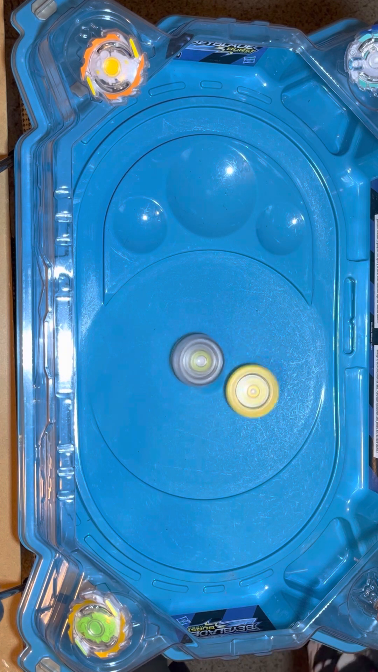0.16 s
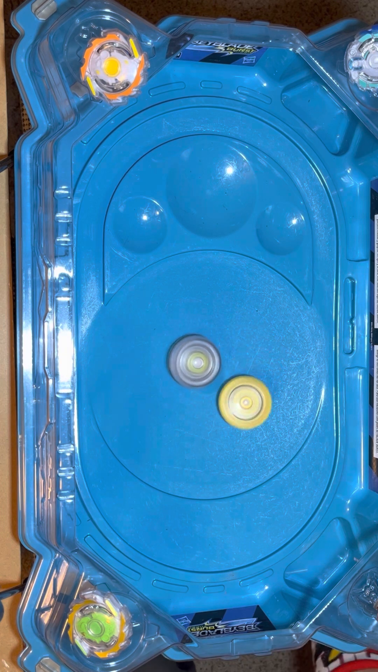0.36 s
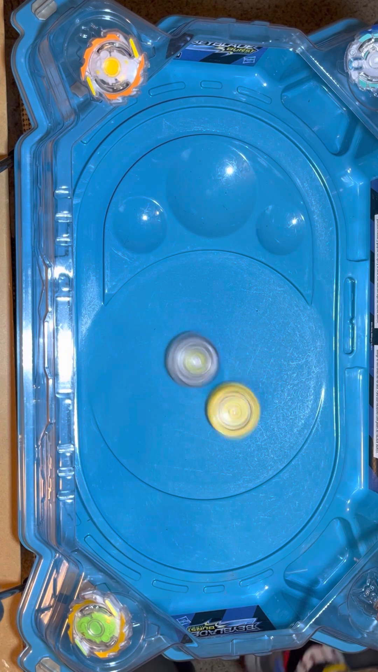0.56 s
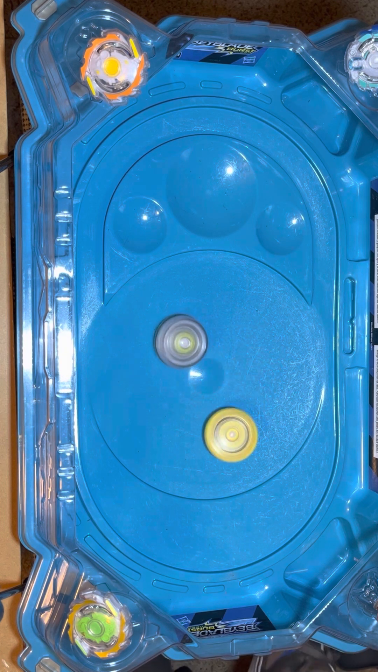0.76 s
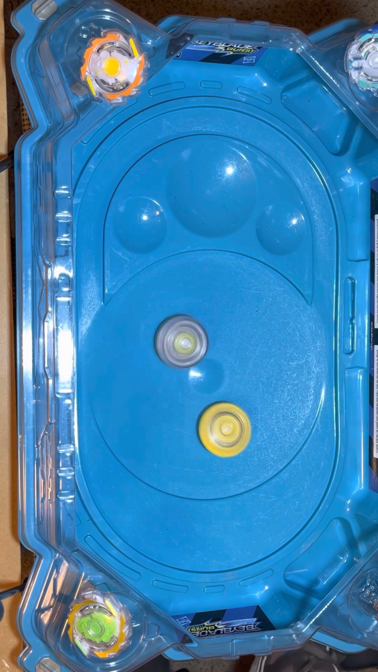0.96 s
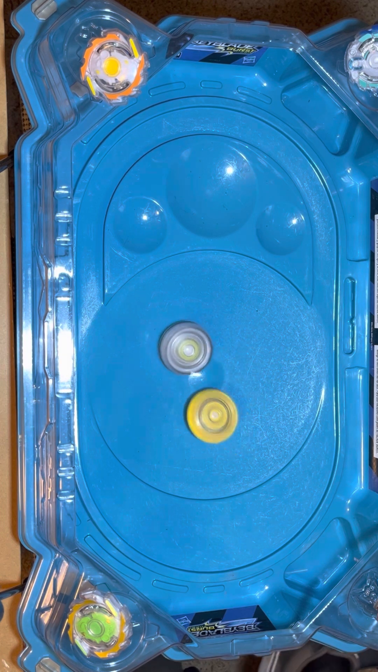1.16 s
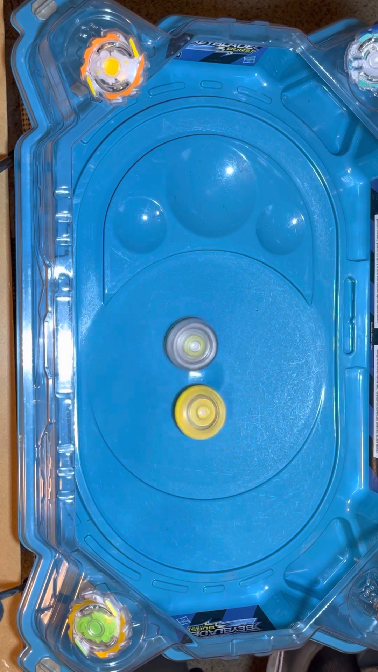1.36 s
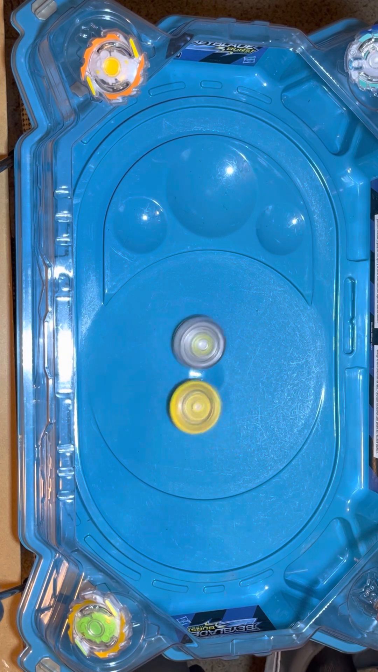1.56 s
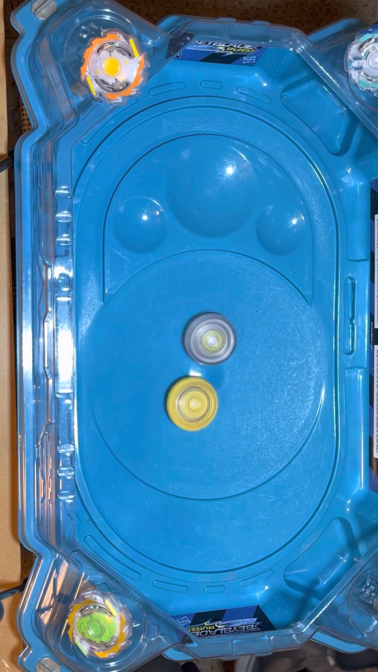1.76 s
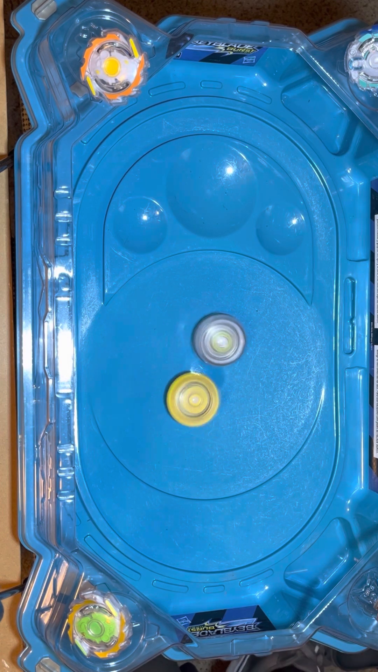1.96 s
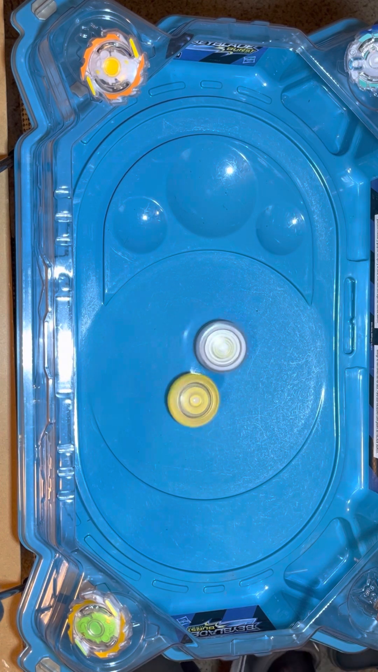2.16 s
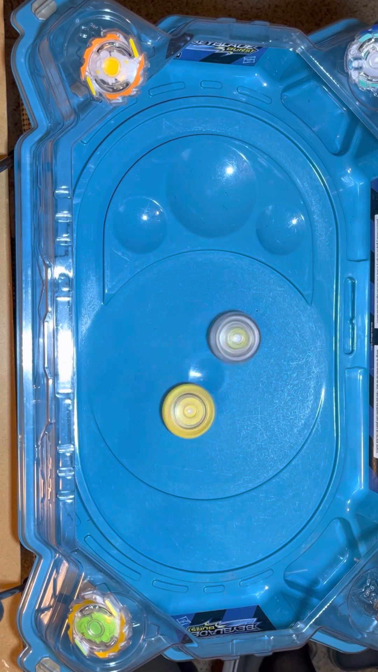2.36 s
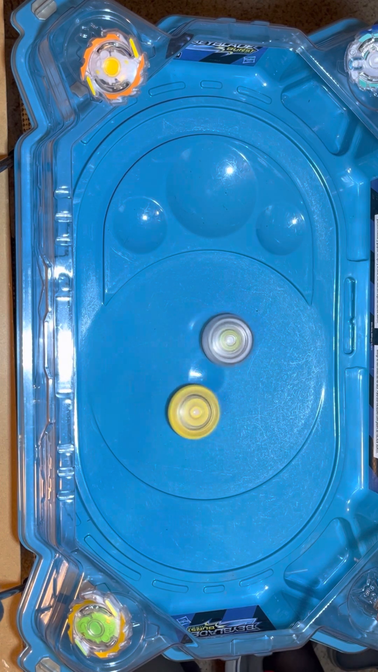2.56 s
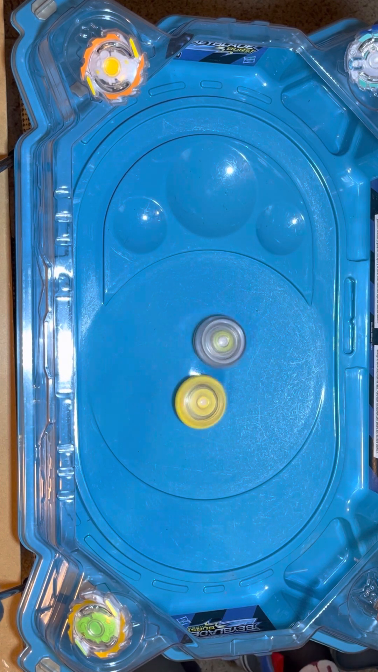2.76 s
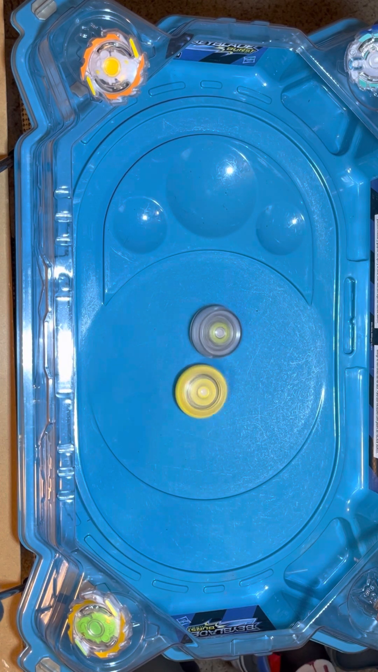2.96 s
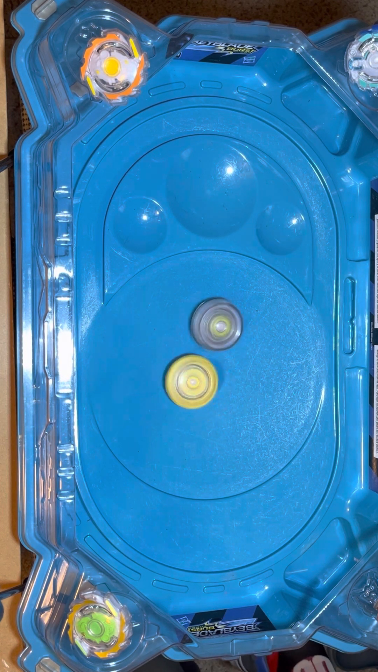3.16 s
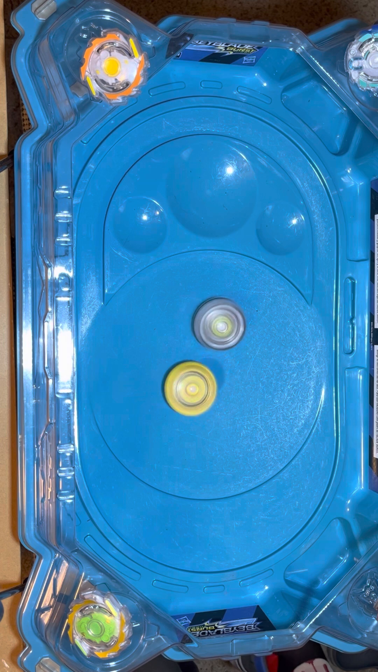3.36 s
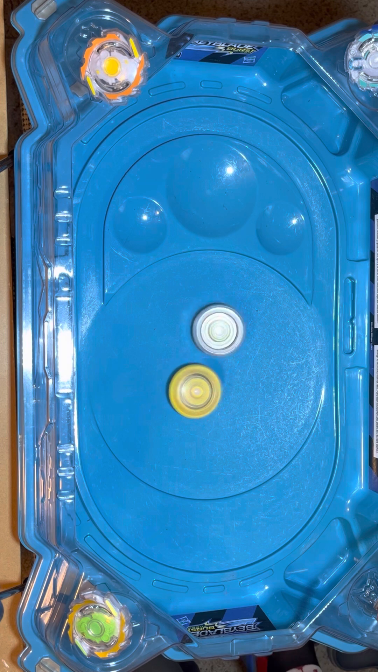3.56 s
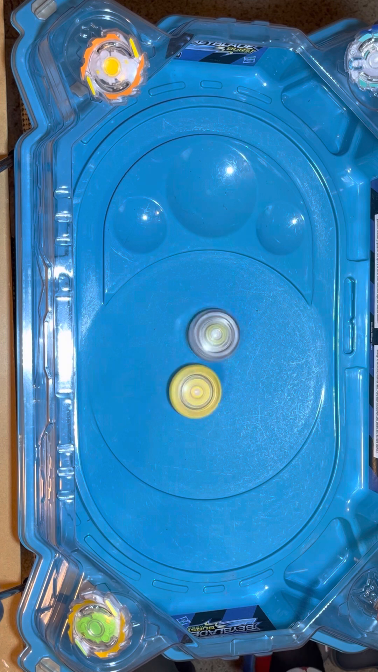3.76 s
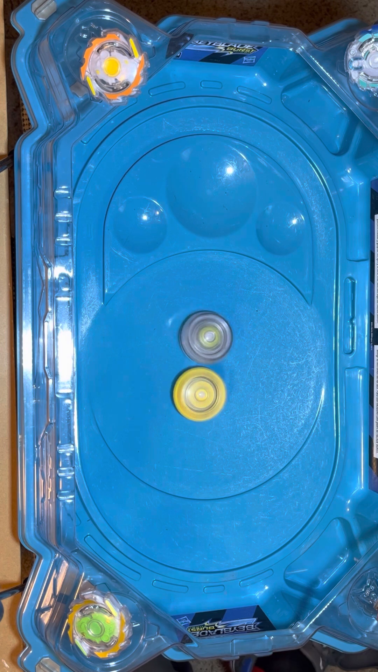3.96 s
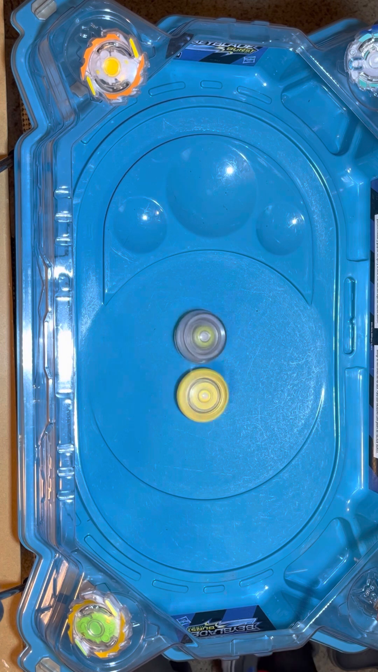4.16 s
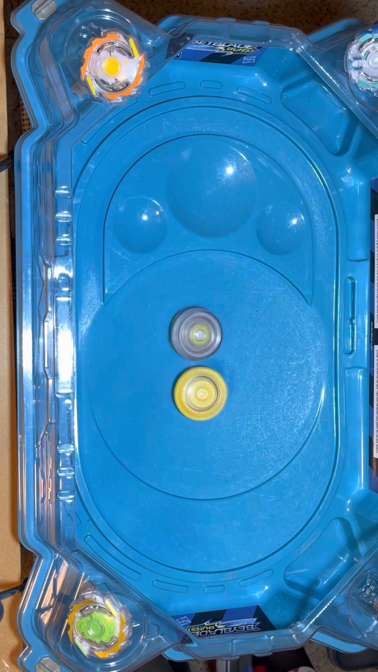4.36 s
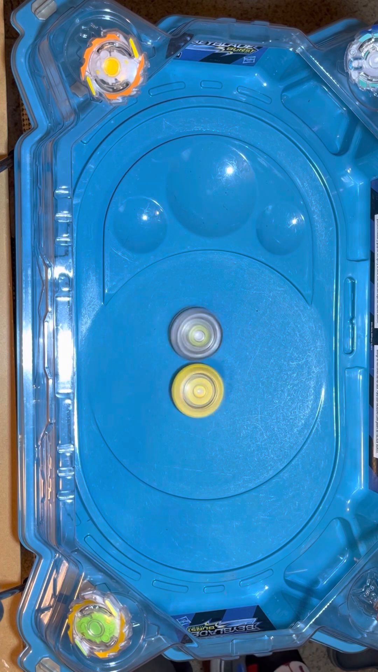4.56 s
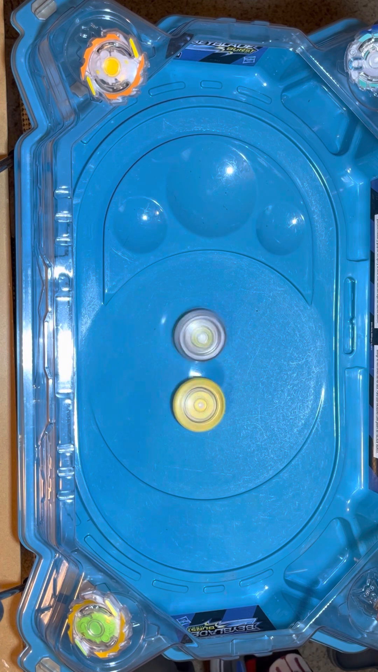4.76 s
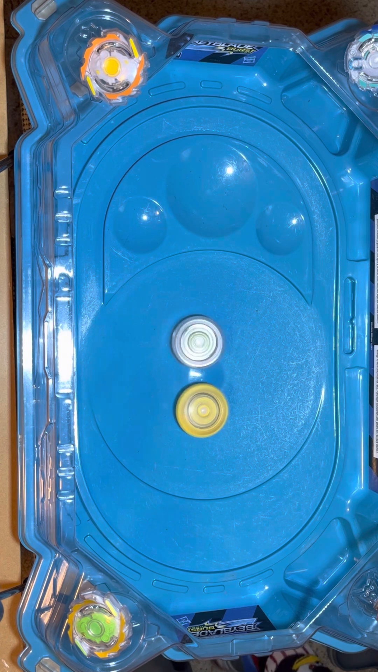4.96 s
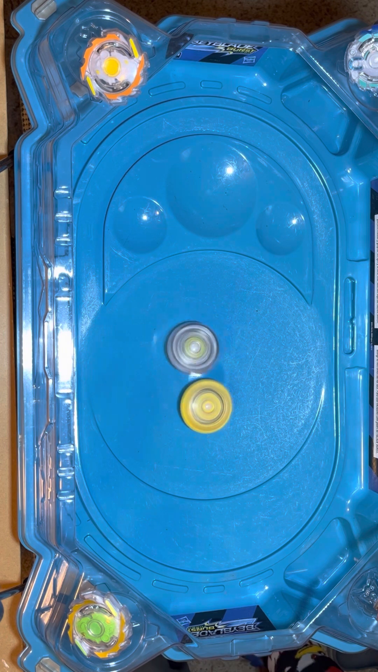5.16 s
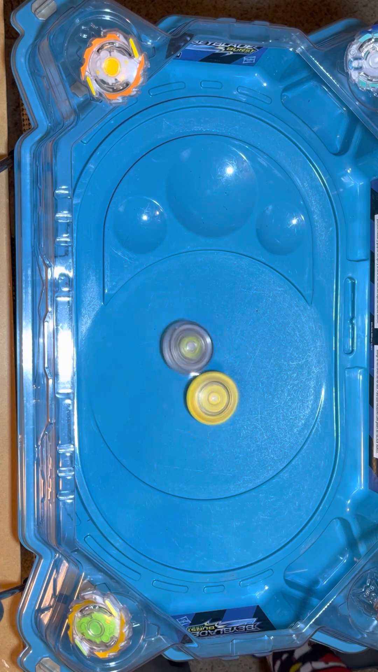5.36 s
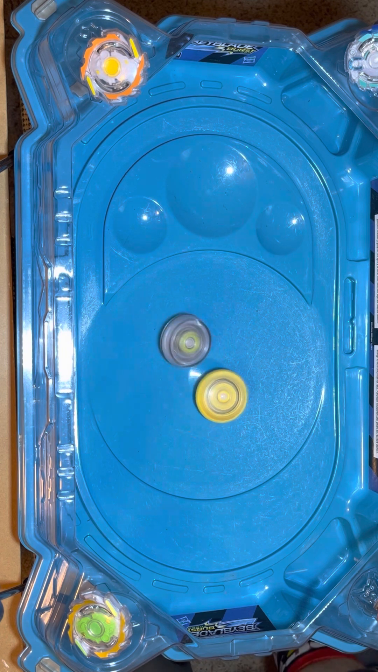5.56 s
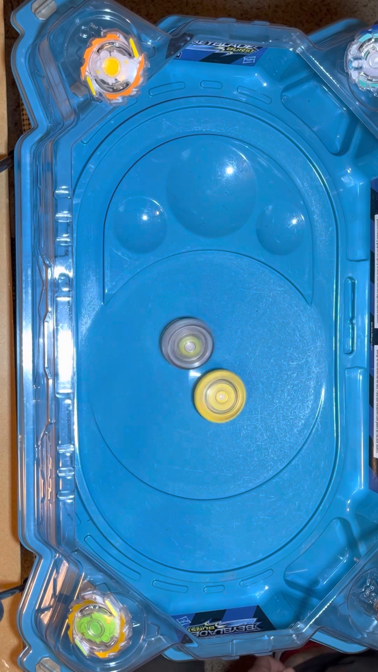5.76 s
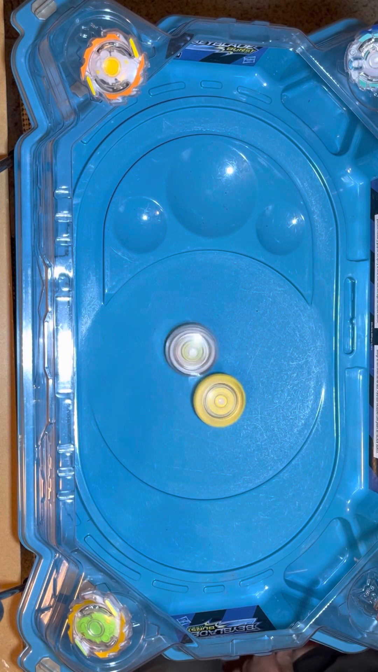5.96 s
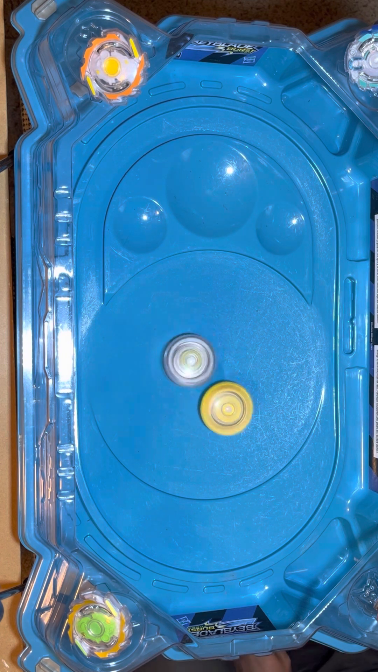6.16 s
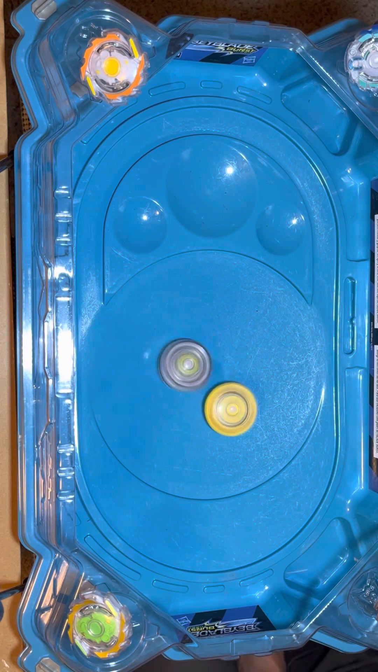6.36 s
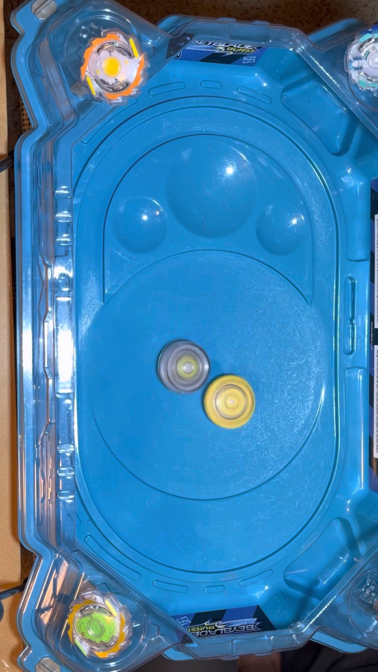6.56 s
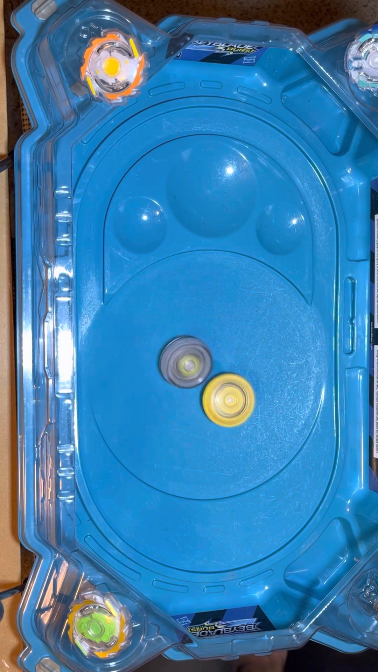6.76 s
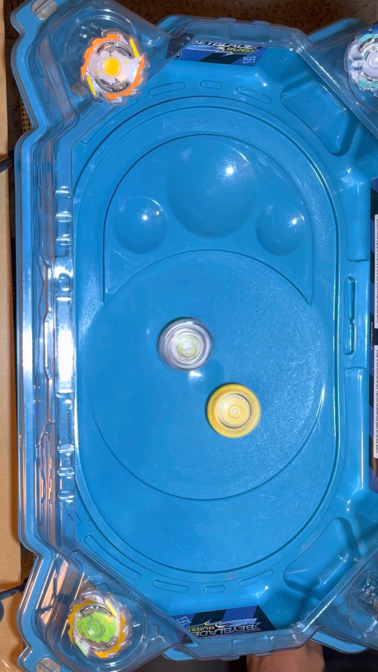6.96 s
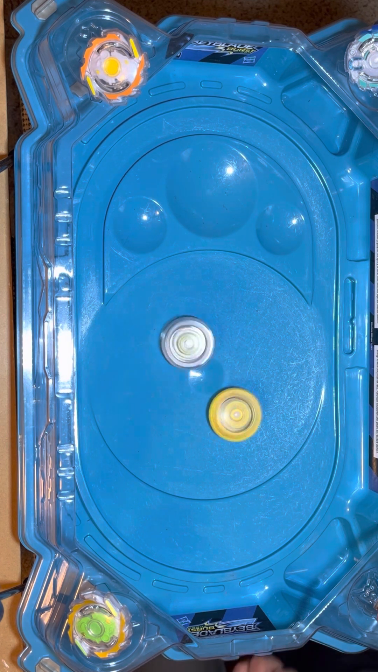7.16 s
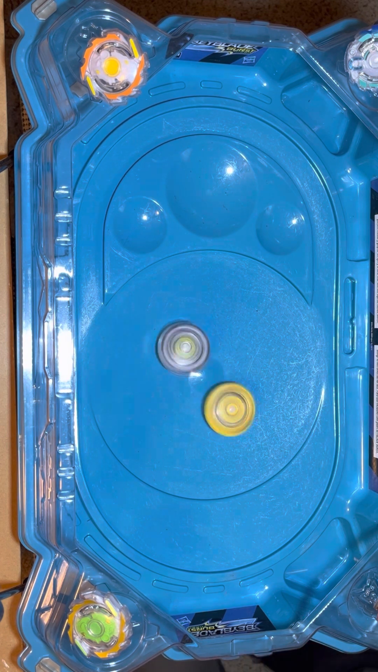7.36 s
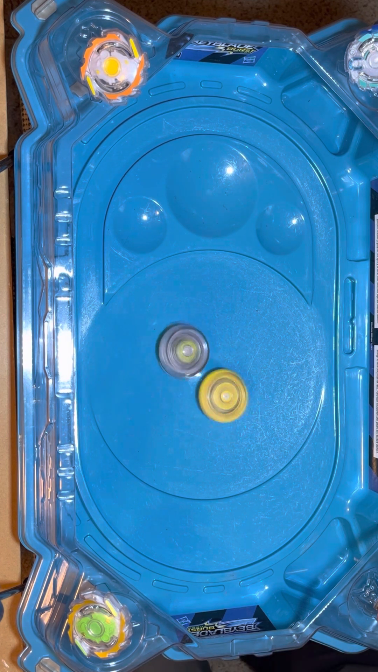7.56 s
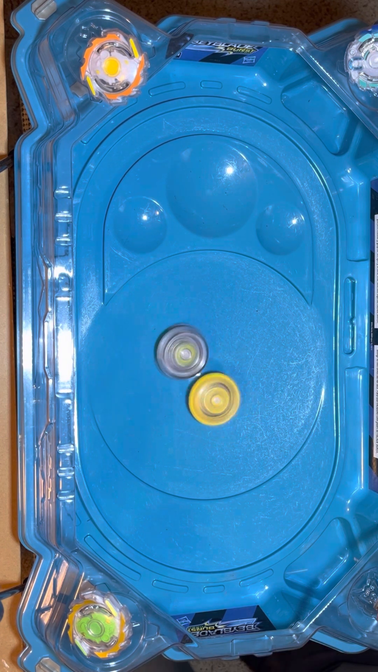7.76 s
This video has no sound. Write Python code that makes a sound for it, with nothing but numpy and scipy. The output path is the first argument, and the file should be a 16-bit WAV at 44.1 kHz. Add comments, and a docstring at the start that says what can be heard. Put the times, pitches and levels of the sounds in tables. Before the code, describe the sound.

Two toy tops spin in a thin plastic arena, heard from close above. Their tips make a faint, gritty whirr throughout, over a low, steady, slightly pulsing hum. The tops collide in sharp, bright clacks, each with a short metallic ring and a little skid. Clacks land at about 0.1 and 0.5 seconds, then a quick pair at 1.3, one at 1.5, another pair at 1.9 and a strong hit at 2.2. More follow at 2.8 and 3.1, lighter ones at 3.7 and 4.0, and a hard one at 4.6. The plastic rumbles softly after some hits, and a wobbling top briefly buzzes and ticks, mostly in the first second and around 5.5. Further clacks come at 5.2, 5.4, 5.9, 6.7 and 6.9 seconds. Small taps and dull knocks follow, then two last sharp clacks near 7.7 and 7.8.

```python
"""In a thin plastic arena, two spinning toy tops collide, heard by a phone held above them.
Each impact excites a broadband crack and the damped modes of tops and shell, then the tips skid.
Sliding friction makes the tips whirr and drives the shell's lowest modes into a rumble. A wobbling
top ticks once a turn and forces a harmonic drone. Beneath lie a beating hum and faint room noise."""
import sys
import numpy as np
from scipy import signal
from scipy.fft import rfft, irfft, next_fast_len
from scipy.io import wavfile
from scipy.ndimage import uniform_filter1d

SR = 44100
rng = np.random.default_rng(int(sys.argv[2]) if len(sys.argv) > 2 else 0)


def log_audio(samples):
    """Write samples as a 16-bit WAV file to the path given in sys.argv[1]."""
    # one column per channel
    frames = np.atleast_2d(samples).T
    # limit to full scale, then quantise
    limited = np.clip(frames, -1, 1)
    pcm = np.round(limited * 32767).astype(np.int16)
    wavfile.write(sys.argv[1], SR, pcm)


N = 347949
T = np.arange(N) / SR
M = next_fast_len(N)
F = np.arange(M // 2 + 1) * SR / M
OCTAVE = np.log2(F + 1)
BAND_CENTRES_HZ = 250 * 2 ** np.arange(0, 6.1, .5)


def undb(db):
    return np.exp(np.asarray(db) * np.log(10) / 20)

def unit(x):
    return x / np.sqrt(np.mean(x ** 2))

def noise_spectrum():
    return rfft(rng.standard_normal(M))

def over_time(table):
    """A table's columns, interpolated at every sample."""
    times, *columns = np.transpose(table)
    return [np.interp(T, times, c) for c in columns]

def at_frequency(table, hz):
    """A table's columns, interpolated in log frequency."""
    centres, *columns = np.transpose(table)
    return [np.interp(np.log(hz), np.log(centres), c) for c in columns]

def resonances(modes):
    """Superposed responses of second-order resonators (f/Hz, bandwidth/Hz, gain/dB)."""
    return sum(undb(db) / (1 + 1j * (F ** 2 - hz ** 2) / ((F + 1) * width)) for hz, width, db in modes)

def window(hz):
    """Cosine passband reaching half an octave to either side of hz."""
    octaves = OCTAVE - np.log2(hz)
    return np.where(np.abs(octaves) < .5, np.cos(np.pi * octaves), 0)

def band(spectrum, hz):
    """One band of a spectrum as a signal of unit RMS."""
    return unit(irfft(spectrum * window(hz), M)[:N])

def shelves(hz):
    """Weights, 0 to 1, with which a band takes bass and treble gains."""
    return np.clip(2 * np.log2(1400 / hz), 0, 1), np.clip(np.log2(hz / 2800), 0, 1)

def decays(times, sizes, t60):
    """Envelope that jumps at each time and decays exponentially."""
    impulses = np.zeros(N)
    np.add.at(impulses, np.minimum((times * SR).astype(int), N - 1), sizes)
    return signal.lfilter([1], [1, -np.exp(-np.log(1000) / (t60 * SR))], impulses)

def swells(times, sizes, lengths, rise_s):
    """Envelope with an exponential rise and a Gaussian fall after each time."""
    out = np.zeros(N)
    for start, size, length in zip(times, sizes, lengths):
        i = int(start * SR)
        t = T[:min(int(3 * length * SR), N - i)]
        out[i:i + len(t)] += size * (1 - np.exp(-t / rise_s)) * np.exp(-(t / length) ** 2)
    return out

def wander(rate_hz):
    """Smoothly joined random values with a spread near 1."""
    steps = uniform_filter1d(np.repeat(rng.standard_normal(int(N / SR * rate_hz) + 2), 4), 4)
    return 1.2 * np.interp(T * rate_hz * 4, np.arange(len(steps)), steps)

def strike(out, start, hz, db, t60):
    """Impulse response of modes: adds damped sinusoids to out."""
    i = int(start * SR)
    t = T[:min(int(np.max(t60) * SR * .7), N - i), None]
    envelope = (1 - np.exp(-t / .0008)) * undb(db - 60 * t / t60)
    out[i:i + len(t)] += (envelope * np.sin(2 * np.pi * hz * t)).sum(axis=1)


# Room noise spectrum: f/Hz, level/dB per half octave
ROOM_SPECTRUM = [(30, -62), (60, -85), (150, -70.5), (300, -73), (500, -79.5), (1000, -74.5), (3000, -86),
                 (16000, -89)]

def room_noise():
    """Incoherent bands add in power to a noise floor, which drifts slightly in level."""
    power = 0
    for hz in 31.25 * 2 ** np.arange(0, 9.1, .5):
        db, = at_frequency(ROOM_SPECTRUM, hz)
        passband = window(hz) ** 2
        power += undb(db) ** 2 * passband / np.mean(passband)
    return undb(0.5 * wander(11)) * irfft(noise_spectrum() * np.sqrt(power), M)[:N]


def room_hum(hz=119.92, neighbour_hz=122.55, beat_peak_s=.34):
    """Beating: a tone with a faint octave interferes with a close neighbour; narrowband noise wavers."""
    waver = unit(irfft(noise_spectrum() * resonances([(hz, 24, 0)]) ** 2, M)[:N])
    phase_per_hz = 2 * np.pi * (T - beat_peak_s)
    tone = np.sin(hz * phase_per_hz) + undb(-26) * np.sin(2 * hz * phase_per_hz)
    neighbour = undb(-10.5) * np.sin(neighbour_hz * phase_per_hz)
    return undb(-48.5) * unit(unit(tone + neighbour) + undb(-3) * waver)


# Tips rubbing on the shell: t/s, level/dB, treble gain/dB, shell body gain/dB
TIP_WHIRR = [(0, -57, -8, -21), (.33, -62.5, -12, -14.5), (.5, -60.5, -8, -17), (.8, -61, -13.5, -21),
             (1.2, -56, -11.5, -15.5), (1.4, -65.5, -10.5, 7), (1.72, -56.5, -6.5, -3),
             (2, -67, -11.5, -2.5), (2.3, -57, -13.5, -2.5), (2.66, -74.5, -9, -5.5),
             (2.9, -70.5, -14, 10.5), (3.05, -61.5, -14, 5), (3.25, -65, -8.5, 10), (3.67, -59, -13.5, 3.5),
             (4.11, -68, -17, 8), (4.3, -61.5, -10.5, 0), (4.57, -57, -6, -3), (4.75, -59, -15.5, 0),
             (5.05, -72.5, -15.5, 2.5), (5.27, -78, -12, 0), (5.41, -57, -15.5, 3), (6.03, -52, -15, -3),
             (6.2, -68.5, -16, -5), (6.45, -63.5, -16.5, -5), (6.7, -68, -8.5, -6), (6.85, -59, -9, -6.5),
             (7, -68.5, -17.5, -5), (7.56, -64.5, -23, 1), (7.68, -52, -38, -2), (7.89, -59, -10, 15)]
# Shell resonances: f/Hz, bandwidth/Hz, gain/dB re broadband noise
SHELL_RESONANCES = [(630, 40, 4), (840, 80, 7), (1270, 70, 4), (1770, 90, 8), (2060, 120, 8),
                    (2850, 200, 2), (3240, 100, 2), (3700, 200, 3)]
# Contact spectra: f/Hz, crack gain/dB, crack T60/s, echo gain/dB re crack, echo T60/s,
# skid gain/dB, whirr gain/dB, tick gain/dB
CONTACT_SPECTRA = [(368, -21.5, 0.041, -2, 0.13, -19, -18.5, -5),
                   (505, -30, 0.0097, -9.5, 0.05, -21, -24, -14.5),
                   (757, -8.5, 0.07, 0, 0.22, -15.5, -15, -9.5),
                   (1330, -23.5, 0.026, -14.5, 0.26, -11.5, -11.5, -5.5),
                   (2010, -12, 0.022, -19.5, 0.29, -9.5, -10.5, 0),
                   (2700, -20, 0.018, -9.5, 0.2, -12.5, -15.5, -7),
                   (4000, -11, 0.014, -8.5, 0.14, -9, -6.5, -6.5),
                   (5450, -2, 0.014, -15.5, 0.099, -8, -5.5, -10.5),
                   (8100, 3, 0.0071, -23, 0.17, -13.5, -6, -10.5),
                   (11160, -2.5, 0.0084, -10.5, 0.078, -14, -16.5, -14),
                   (16000, -1, .008, -29.5, 0.063, -15, -17, -10.5)]

def tip_contact(skid_treble_db=-2.5):
    """Source and filter: friction (whirr, skids) and ticks modulate noise coloured by the shell."""
    shell_noise = noise_spectrum() * np.abs(1 + resonances(SHELL_RESONANCES))
    shell_noise /= 1 + (F / 14500) ** 40  # steep low-pass
    level_db, treble_db, body_db = over_time(TIP_WHIRR)
    sliding = skids()
    tick_times, tick_db, tick_treble_db = ticks()
    roughness = grit()
    out = np.zeros(N)
    for hz in BAND_CENTRES_HZ:
        *_, skid_gain, whirr_gain, tick_gain = at_frequency(CONTACT_SPECTRA, hz)
        low, high = shelves(hz)
        grip = undb(1.4 * wander(25) + 2.2 * wander(4))  # uneven friction: each band flickers
        whirr = undb(level_db + whirr_gain + high * treble_db + low * body_db)
        skid = undb(skid_gain + high * skid_treble_db) * sliding
        tick = decays(tick_times, undb(tick_db + tick_gain + high * tick_treble_db), t60=.028)
        out += (grip * roughness * (whirr + skid) + tick) * band(shell_noise, hz)
    return out


def grit(rate_hz=60):
    """Surface roughness: specks catch under the tips at random and briefly raise the friction gain."""
    when, size = rng.random((int(rate_hz * N / SR), 2)).T
    return 1 + decays(when * N / SR, undb(-7 - 2.5 * np.log(size)), t60=.03)


# Lowest shell modes: f/Hz, bandwidth/Hz, relative gain/dB
LOW_SHELL_MODES = [(60, 3.9, 18.5), (80.3, 20, 22), (134, 22, 17.5), (183, 8.7, 6.5), (266, 17, -21.5),
                   (370, 23, -37)]

def rumble(stir_db=-56.5, stir_share=.3):
    """Random forcing of the shell's lowest modes: in bursts by skids, continuously by the whirr."""
    times, level_db, *_, rumble_db, skid_s = np.transpose(IMPACTS)
    bursts = swells(times, undb(level_db + rumble_db), .79 * skid_s, rise_s=.0088)
    whirr_db = over_time(TIP_WHIRR)[0]
    stirring = undb(stir_db + stir_share * (whirr_db + 62))
    response = resonances(LOW_SHELL_MODES)
    noise = rng.standard_normal(M)
    steady_rms = np.std(irfft(rfft(noise) * response, M))
    force = noise[:N] * (bursts + stirring)
    return irfft(rfft(force, M) * response, M)[:N] / steady_rms


# Clashes and grazes: t/s, level/dB, then gains on that level: shell knock/dB, treble/dB, ring/dB,
# skid/dB, rumble/dB; last, skid duration/s
IMPACTS = [(0.0909, -9, -24, -6, -1, -37.5, -34.5, 0.1), (0.5446, -8.5, -29.5, -7.5, 1, -27, -25.5, 0.093),
           (1.266, -9, -23, -9.5, 3.5, -26.5, -26, 0.063), (1.307, -12, -14.5, -6.5, 0, -41, -22, 0.088),
           (1.5401, -16, -20.5, -2, 5, -15.5, -14, 0.061), (1.8714, -11, -18, -5, 0.5, -29, -31.5, 0.088),
           (1.92, -11.5, -12.5, -7, 0, -42, -24.5, 0.079),
           (1.9781, -30.5, -13, -20, -14, -47, -21.5, 0.076),
           (2.2364, -7.5, -20, -8, -3.5, -28.5, -22.5, 0.071), (2.3203, -33, -4, -28, -14, -52, -10, 0.053),
           (2.355, -46, -5.5, -23, -12, -25, -13, 0.18), (2.587, -53.5, -19, -8, 1, -27, -3.5, 0.12),
           (2.618, -44, -16.5, -20, 0, -38, -22, 0.043),
           (2.8401, -11.5, -15, -9.5, -10, -31.5, -18.5, 0.076),
           (2.976, -41, -12, -17.5, 1, -33, -5.5, 0.042), (2.9957, -37, -10.5, -23, -2, -32, -6, 0.056),
           (3.1338, -12, -9.5, -5.5, -12.5, -36, -19, 0.071),
           (3.717, -18, -11.5, -14.5, -2, -26.5, -24.5, 0.052),
           (3.9649, -40.5, -18, -24, -12, -49, -23.5, .18),
           (4.0189, -23.5, -21, -10.5, 2.5, -24, -27.5, 0.047),
           (4.583, -11, -6.5, -1, -6.5, -34, -21, 0.082),
           (4.8406, -35, -11.5, -16.5, -9.5, -34, -19.5, 0.096),
           (5.227, -19, -38.5, -9.5, -8, -19, -27.5, 0.039),
           (5.2501, -25.5, -21, -7.5, 3.5, -33, -23, 0.092),
           (5.357, -9, -25.5, -7.5, -0.5, -34, -32, 0.057), (5.906, -14, -20, -10.5, -1.5, -31, -33, 0.13),
           (6.079, -29.5, -14, -30, -5, -26.5, -14.5, 0.081),
           (6.0999, -22.5, -17.5, -9.5, 0.5, -43, -37, 0.072), (6.2277, -42, -21, -24, -4, -40, -9, 0.031),
           (6.2499, -32, -31, -21, -19, -26, -22, .035), (6.3615, -38, -32, -23, 0, -10, -10, 0.064),
           (6.6384, -18.5, -31, -8.5, -5, -38, -28.5, 0.099),
           (6.6583, -8, -15.5, -6.5, -2, -33.5, -34.5, 0.074), (6.778, -42, -11, -16, 9, -16, -23.5, 0.033),
           (6.8758, -9, -24.5, -6.5, -0.5, -25, -21.5, 0.082), (6.98, -24, -24.5, -25, -6, -29, -9, 0.051),
           (7.1516, -40, -14, -27.5, 0.5, -19.5, -14.5, 0.05), (7.1836, -40, -11, -28, -8, -37, -13, 0.033),
           (7.2913, -46.5, -7.5, -24, -0.5, -46, -14.5, 0.13),
           (7.4016, -44.5, -9, -25, -9.5, -33, -28, 0.038),
           (7.5982, -40.5, 1.5, -21.5, -14.5, -36, -15.5, 0.093),
           (7.6098, -28.5, -18, -40, 2.5, -18, -13, 0.042),
           (7.6795, -12, -20, -11.5, -5.5, -35.5, -23.5, .066),
           (7.7334, -32.5, -16, -48, -2, -36, -22, .066),
           (7.8159, -10.5, -20, -5.5, -10, -22.5, -13, 0.057)]
# Metal rim resonances: f/Hz, bandwidth/Hz, gain/dB re broadband noise
RIM_RESONANCES = [(1980, 270, -5), (5310, 290, 7), (7230, 1100, 4.5), (8070, 530, 5), (11620, 320, 7.5),
                  (14000, 700, 1.5)]

def cracks(rise_s=.00045, rise_cycles=.96):
    """Impulsive excitation: a brief contact of the rims gives a broadband burst and a longer echo."""
    times, level_db, knock_db, treble_db, *_ = np.transpose(IMPACTS)
    rim_noise = noise_spectrum() * np.abs(1 + resonances(RIM_RESONANCES))
    out = np.zeros(N)
    for hz in BAND_CENTRES_HZ:
        crack_gain, crack_t60, echo_gain, echo_t60, *_ = at_frequency(CONTACT_SPECTRA, hz)
        low, high = shelves(hz)
        blows = undb(level_db + crack_gain + low * knock_db + high * treble_db)
        envelope = decays(times, blows, crack_t60) + decays(times, blows * undb(echo_gain), echo_t60)
        # a blow takes time to spread through the shell, longest in the bass
        pole = np.exp(-1 / ((rise_s + rise_cycles / hz) * SR))
        out += signal.lfilter([1 - pole], [1, -pole], envelope) * band(rim_noise, hz)
    return out


# Modes of tops and shell: f/Hz, relative level/dB, T60/s before added damping
RING_MODES = [(622, -10, 0.33), (785, 0, 0.091), (1133, 2.5, 0.12), (1234, -2.5, 0.037), (1738, -11, 0.037),
              (1773, -7, 0.3), (2120, -3, 0.12), (2844, 1, 0.3), (3120, -14.5, 0.058), (3700, -8.5, 0.075),
              (4140, -18, 0.12), (5430, -6.5, 0.42), (6930, -10, .15), (8270, -8, 0.27), (7780, -8, 0.26),
              (10200, -22, 0.087), (10800, -8.5, 0.1), (11800, -9.5, 0.1), (13900, -11.5, .04)]

def ringing(gain_db=-22, scatter_db=3.5, detune=.0067):
    """Free vibration: each impact excites the same modes, with extra weight near a favoured pitch."""
    mode_hz, mode_db, mode_t60 = np.transpose(RING_MODES)
    damped_t60 = np.minimum(.5 * mode_t60, .11)
    out = np.zeros(N)
    for start, level_db, knock_db, _, ring_db, *_ in IMPACTS:
        pitch_draw, level_draw = rng.standard_normal((len(mode_hz), 2)).T
        hz = mode_hz * (1 + detune * pitch_draw)
        db = level_db + ring_db + gain_db + mode_db + scatter_db * level_draw
        db += np.where(hz < 1000, knock_db + 18, 0)  # low modes follow the shell knock
        favoured_hz = 840 if knock_db > -12.5 else 1760
        db += 7.5 * np.exp(-(np.log2(hz / favoured_hz) / .12) ** 2)
        strike(out, start, hz, db, damped_t60)
    return out


def skids():
    """Sliding friction: the envelope of the tips' short slide after each impact."""
    times, level_db, *_, skid_db, _, skid_s = np.transpose(IMPACTS)
    return swells(times, undb(level_db + skid_db), skid_s, rise_s=.014)


# Spells of wobbling: onset t/s, rotation period/s, duration/s
WOBBLES = [(.149, .0228, .38), (.7462, .02445, .5), (3.276, .0405, .3), (4.094, .0413, .34),
           (5.4703, .0478, .35), (5.453, .047, .44)]
# For each spell: tick level/dB, tick treble gain/dB, drone level/dB
WOBBLE_LEVELS = [(-69.5, -4, -51), (-55.5, -7, -50.5), (-62, -7.5, -60.5), (-60, -6, -67),
                 (-52, 4.5, -53.5), (-57.5, -3, -54.5)]

def ticks(scatter_db=2.5):
    """Periodic contact: a wobbling top taps once a turn. Returns t/s, level/dB, treble gain/dB."""
    taps = []
    for (onset, period, duration), (db, treble_db, _) in zip(WOBBLES, WOBBLE_LEVELS):
        taps += [(t, db, treble_db) for t in np.arange(onset, onset + duration, period)]
    times, db, treble_db = np.transpose(taps)
    return times, db + scatter_db * rng.standard_normal(len(times)), treble_db


def drone(best_response_hz=86, fall_db_per_octave=5.5):
    """Forced vibration: a wobbling top drives the shell at harmonics of its rotation rate."""
    out, harmonics = np.zeros(N), np.arange(2, 7)[:, None]
    for (onset, period, duration), (_, _, level_db) in zip(WOBBLES, WOBBLE_LEVELS):
        gate = np.clip(np.minimum(T - onset, onset + duration - T) / .024 + .5, 0, 1)
        on = gate > 0
        hz = harmonics / period
        db = level_db - fall_db_per_octave * np.abs(np.log2(hz / best_response_hz))
        tones = undb(db) * np.sin(2 * np.pi * (hz * T[on] + rng.random(hz.shape)))
        out[on] += gate[on] * undb(2.3 * wander(11)[on]) * tones.sum(axis=0)
    return out


# Metal parts of a top ringing alone: t/s, f/Hz, level/dB, T60/s
METAL_CHINKS = [(.548, 5300, -37, .25), (1.04, 3240, -54, .1), (1.309, 12100, -40, .25),
                (2.842, 4500, -44, .4), (3.136, 5100, -42, .2), (5.36, 12100, -44, .15),
                (6.102, 4550, -57, .3), (6.662, 5300, -41, .2), (7.156, 3800, -55, .03),
                (7.184, 3750, -50, .03), (7.198, 3750, -52, .03), (7.293, 3700, -55, .03),
                (7.404, 3700, -52, .04), (7.586, 3800, -55, .03)]

def chinks():
    """Damped oscillation: a single metal part rings on at one natural frequency."""
    out = np.zeros(N)
    for start, hz, db, t60 in METAL_CHINKS:
        strike(out, start, hz, db, t60)
    return out


# Phase difference between the microphone ports: f/Hz, lead of left/rad
PORT_PHASE = [(0, 0), (100, -.2), (430, -.7), (800, -.25), (1450, -.25), (1720, 0), (2600, 2.2),
              (3500, 1.15), (4900, 1.35), (5510, 2.55), (6890, 4.75), (8270, 6.6), (10330, 9.45),
              (12400, 12.4), (14470, 15.5), (15200, 15.9), (22050, 16)]
# Level difference between the ports: f/Hz, left minus right/dB
PORT_BALANCE = [(30, 1.5), (150, -2), (400, -4), (800, -6.5), (1200, -5), (1800, 0), (16000, -0.5)]

def microphone_ports(sound, reflection_db=-13, reflection_decay_s=.003):
    """Spaced receivers: one sound differs in phase, level and faint, fluctuating reflections."""
    spectrum = rfft(sound, M)
    lead = np.interp(F, *np.transpose(PORT_PHASE))
    balance_db, = at_frequency(PORT_BALANCE, F + 1)
    tilt = undb(balance_db / 2)
    direct = irfft(spectrum * np.array([tilt, np.exp(-1j * lead) / tilt]), M)[:, :N]
    echoes = rng.standard_normal((2, 2000)) * np.exp(-T[:2000] / reflection_decay_s)
    echoes /= np.linalg.norm(echoes, axis=1, keepdims=True)
    bass_cut = (F / (F + 200)) ** 2
    reflected = irfft(spectrum * rfft(echoes, M) * bass_cut, M)[:, :N]
    fluctuation = np.array([wander(150), wander(150)])
    return direct + undb(reflection_db) * fluctuation * reflected


def scene():
    """Linear superposition: tops, shell and room add in pressure and reach two microphone ports."""
    contacts = cracks() + tip_contact()
    tones = ringing() + chinks()
    flutter = 1 + .6 * wander(140)  # the parts spin and rattle as they ring
    return microphone_ports(contacts + tones * flutter + drone() + rumble() + room_hum() + room_noise())


def record(dry):
    """Band limiting: the phone drops the deepest bass, softens the top and then cuts it."""
    bass_cut = signal.butter(4, 48, "high", fs=SR, output="sos")
    treble_rolloff = signal.butter(8, 15900, fs=SR, output="sos")
    treble_cut = signal.ellip(10, .2, 90, 16700, fs=SR, output="sos")
    return signal.sosfilt(np.vstack([bass_cut, treble_rolloff, treble_cut]), dry)


dry = scene()
out = record(dry)
log_audio(out)
```